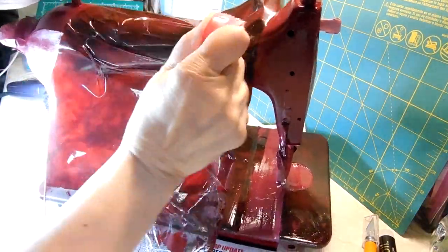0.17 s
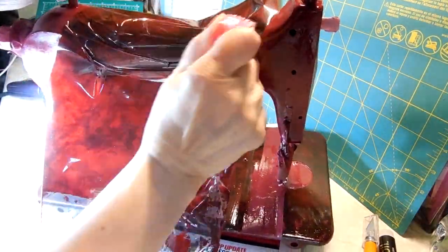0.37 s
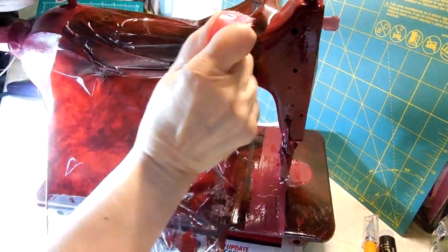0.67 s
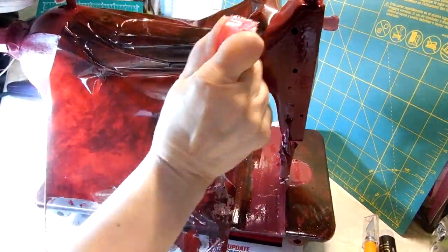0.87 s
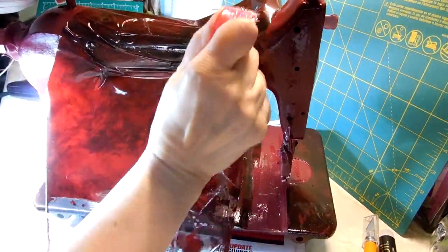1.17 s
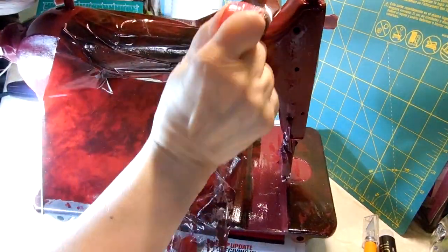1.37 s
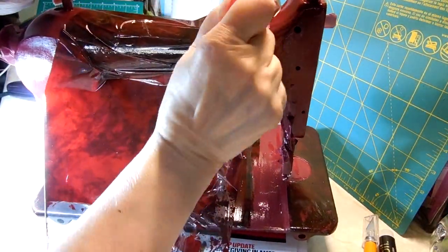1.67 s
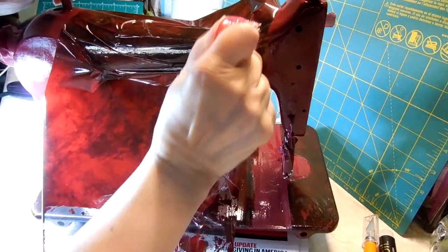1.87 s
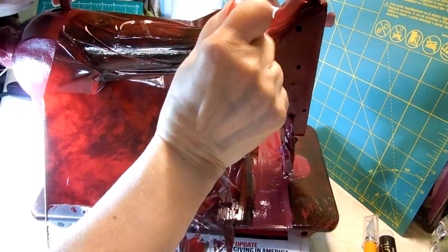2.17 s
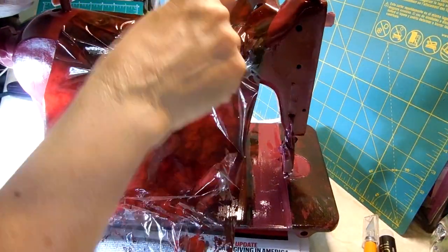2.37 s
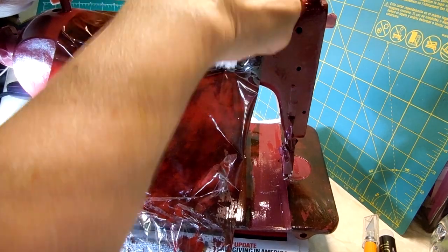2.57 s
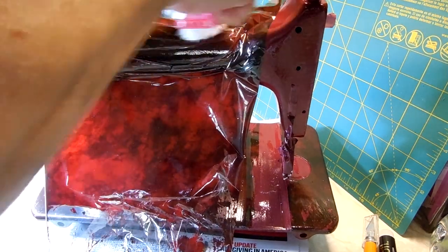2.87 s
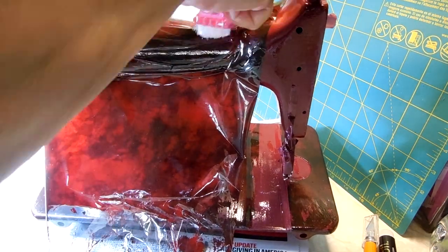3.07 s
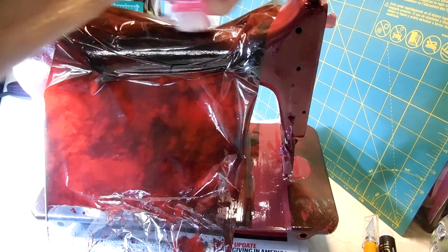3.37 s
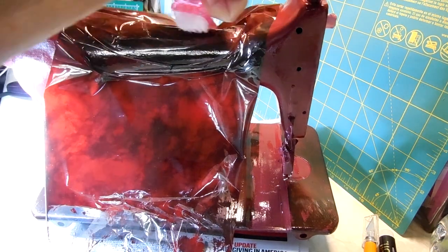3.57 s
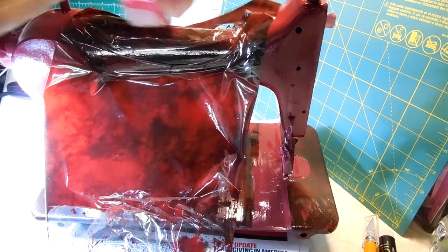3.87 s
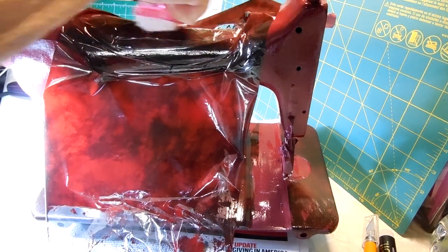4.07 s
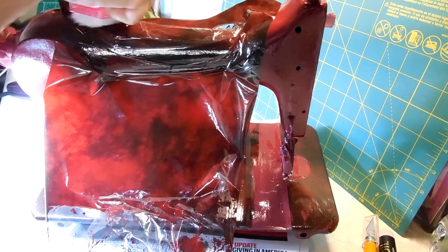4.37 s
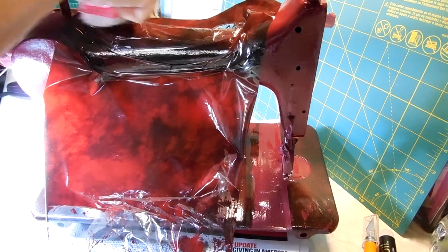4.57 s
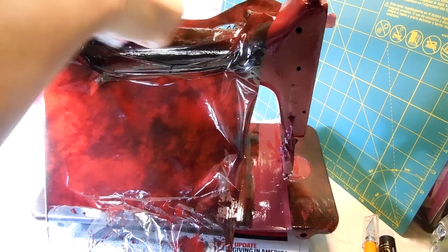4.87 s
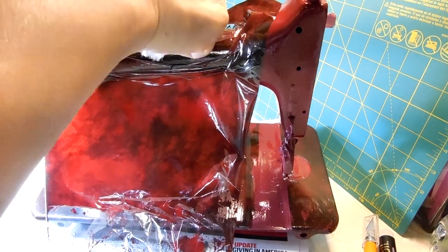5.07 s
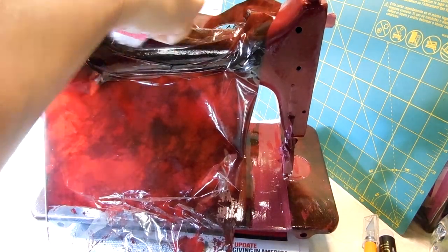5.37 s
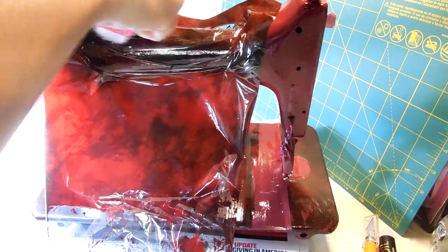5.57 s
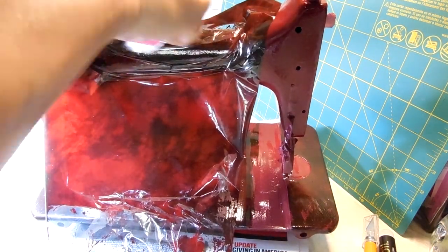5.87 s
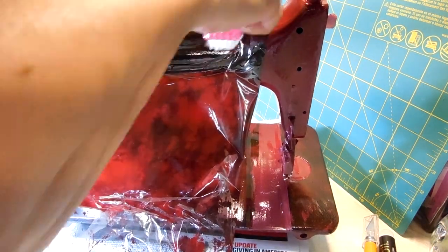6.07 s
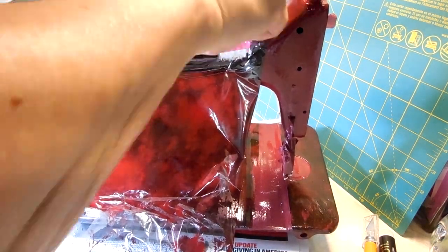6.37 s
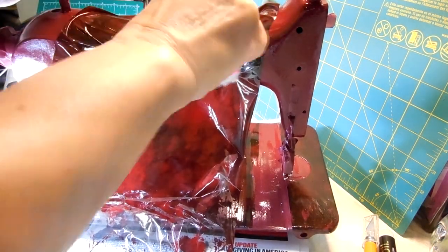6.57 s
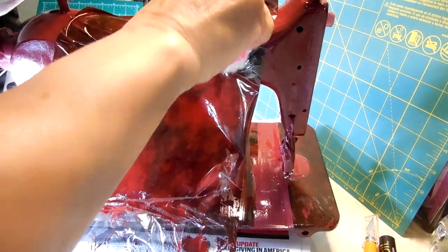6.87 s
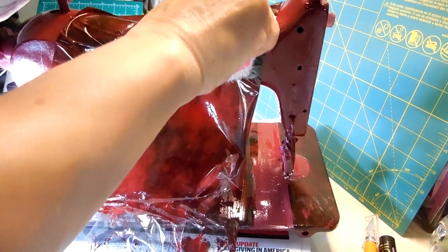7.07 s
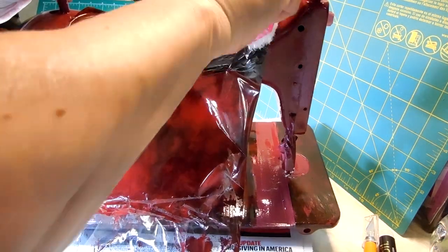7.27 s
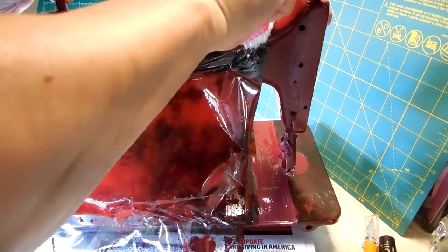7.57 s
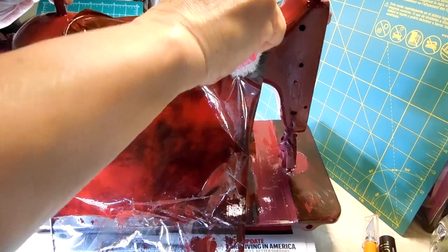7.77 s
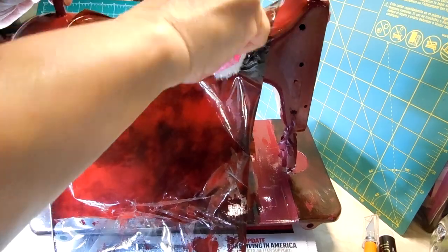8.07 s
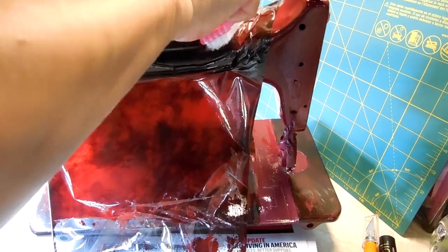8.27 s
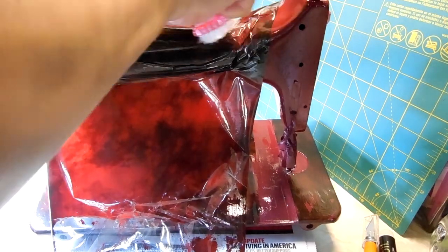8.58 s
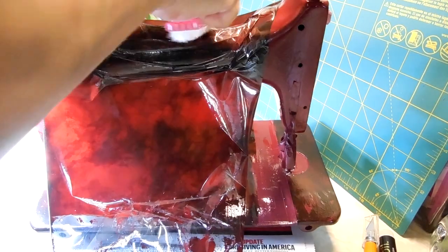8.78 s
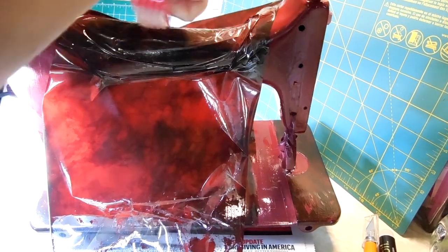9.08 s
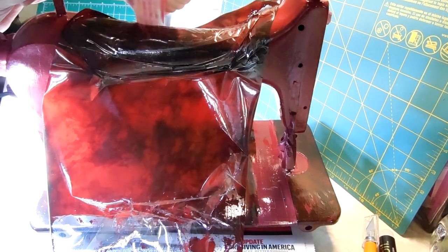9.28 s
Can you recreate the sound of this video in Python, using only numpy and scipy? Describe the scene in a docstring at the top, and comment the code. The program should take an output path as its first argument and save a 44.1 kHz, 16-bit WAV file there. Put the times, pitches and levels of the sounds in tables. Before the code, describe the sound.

Fast, bright, scratchy brush strokes on wrinkled foil with sharp snaps and crackles, nearly stopping once before resuming, in a small room with fan noise.

```python
"""Stiff brush on crumpled foil

A short stiff brush scrubs back and forth over thin foil on a hard body, close to a two-port microphone.
The hiss is dense random bristle flicks and short tuft rings that swell and fade with each stroke.
Folds buckle as short damped sines; big folds snap with a ring, a burst of rattle and a low knock.
A short room answer follows the foil, over filtered fan noise with faint, wavering motor tones.
"""
import sys
import numpy as np
from scipy import signal
from scipy.fft import rfft, irfft, next_fast_len
from scipy.io import wavfile
from scipy.ndimage import uniform_filter1d, map_coordinates

SR = 44100
rng = np.random.default_rng(int(sys.argv[2]) if len(sys.argv) > 2 else 0)


def unload_wav(signal):
    """Save mono or channel-first audio to the path in sys.argv[1] as 16-bit WAV at rate SR, clipped to [-1, 1]."""
    wavfile.write(
        sys.argv[1],
        SR,
        np.round(np.clip(np.atleast_2d(signal).T, -1, 1) * 32767).astype(np.int16),
    )


N = 414981  # length in samples

# Brush strokes, back and forth. Each row: start in seconds, length in seconds,
# drive of the bristle hiss at the fastest moment in dB.
BRUSH_STROKES = [(-0.02, 0.11, -23.5), (0.066, 0.14, -23.5), (0.216, 0.14, -15.0), (0.341, 0.13, -22),
                 (0.487, 0.12, -20.5), (0.592, 0.058, -20), (0.62, 0.11, -20.5), (0.729, 0.22, -20.5),
                 (0.923, 0.094, -29), (0.998, 0.092, -21.5), (1.03, 0.21, -22.5), (1.215, 0.118, -17.0),
                 (1.326, 0.15, -19.0), (1.475, 0.15, -21.0), (1.611, 0.14, -20), (1.753, 0.11, -16.5),
                 (1.865, 0.15, -15.5), (2.007, 0.14, -18), (2.152, 0.12, -17.0), (2.211, 0.23, -25.5),
                 (2.446, 0.14, -15.5), (2.657, 0.12, -19.5), (2.767, 0.033, -24.5), (2.738, 0.2, -27.0),
                 (2.944, 0.087, -17.5), (3.026, 0.075, -28.5), (3.03, 0.231, -26.5), (3.211, 0.065, -19.5),
                 (3.249, 0.17, -21.5), (3.415, 0.11, -17.5), (3.526, 0.13, -14.5), (3.645, 0.13, -19.5),
                 (3.78, 0.13, -19.5), (3.913, 0.11, -20.5), (4.012, 0.12, -19.0), (4.133, 0.101, -21),
                 (4.245, 0.11, -16), (4.358, 0.099, -25.0), (4.482, 0.13, -26.5), (4.574, 0.12, -33),
                 (4.694, 0.12, -27.0), (4.786, 0.12, -28.0), (4.92, 0.1, -27.5), (4.988, 0.17, -36),
                 (5.355, 0.11, -45), (5.486, 0.18, -20.5), (5.695, 0.26, -27.5), (5.91, 0.12, -28),
                 (6.051, 0.083, -20.0), (6.142, 0.19, -21.0), (6.271, 0.059, -25), (6.35, 0.071, -19.5),
                 (6.462, 0.11, -21.5), (6.563, 0.12, -20.0), (6.734, 0.14, -22), (6.901, 0.123, -18.5),
                 (7.023, 0.15, -22.5), (7.171, 0.15, -25.5), (7.321, 0.13, -21), (7.467, 0.17, -28.5),
                 (7.642, 0.16, -26.5), (7.786, 0.16, -31.5), (7.94, 0.2, -30.0), (8.119, 0.14, -22.0),
                 (8.271, 0.12, -21), (8.303, 0.23, -19.0), (8.441, 0.29, -27.5), (8.649, 0.085, -18.5),
                 (8.749, 0.11, -17.5), (8.835, 0.16, -21.5), (8.946, 0.42, -29), (9.266, 0.096, -17.0),
                 (9.344, 0.13, -27)]
FASTEST_AT = 0.51  # share of the stroke spent speeding up
HISS_GROWS, CREASE_GROWS = 2.1, 1.5  # powers of the brush speed


def pressure():
    """Amplitude of hiss and of buckling: every stroke speeds up, then slows to its turn."""
    t = np.arange(N) / SR
    hiss, crease = np.zeros(N), np.zeros(N)
    for start, length, hiss_db in BRUSH_STROKES:
        part = slice(max(round(start * SR), 0), round((start + length) * SR))
        progress = (t[part] - start) / length
        speed = np.sin(np.pi / 2 * np.interp(progress, [0, FASTEST_AT, 1], [0, 1, 0]))
        hiss[part] += amp(hiss_db) * speed ** HISS_GROWS
        crease[part] += amp(hiss_db) * speed ** CREASE_GROWS
    # a smoothed copy of the hiss keeps the foil rustling through the turns
    settling = amp(-9) * uniform_filter1d(hiss, round(0.18 * SR))
    return hiss + np.abs(settling), crease * amp(crumple_db(t))


# Tone of the bristles on the foil. Each row: frequency in Hz, relative level in dB.
BRISTLE_TONE = [(300, -61), (1200, -19.5), (2400, -12.5), (3300, -9.5), (5900, -6.5), (7800, -1),
                (10100, -6), (12100, -15), (14000, -22.5), (16400, -42)]


def bristles(hiss):
    """Dense single flicks of uneven size, and tufts that ring the foil briefly at a pitch of their own."""
    count = 250000
    size = rng.standard_normal(count) * uneven(2.4, count)
    flicks = unit(scattered(rng.uniform(0, N / SR, count), size[:, None], lag_s=3.3e-5))

    count = 16000
    pitch_hz = rng.uniform(2030, 13150, count)
    rings = uneven(2.6, count)[:, None] * buckles(pitch_hz, cycles=30, size=200)
    tufts = unit(scattered(rng.uniform(0, N / SR, count), rings, lag_s=4e-5))

    grip = catches(rate=80, spread_db=2.0, fade_s=0.0065, steady=1.32)
    return hiss * unit(coloured((flicks + amp(-5.0) * tufts) * grip, BRISTLE_TONE))


def catches(rate, spread_db, fade_s, steady):
    """Over a steady drag, bristle tufts catch at random, let go at once and then die away."""
    count = round(rate * N / SR)
    kicks = np.bincount(rng.integers(0, N, count), uneven(spread_db, count), N)
    fading = signal.lfilter([1], [1, -np.exp(-1 / (fade_s * SR))], kicks)
    return unit(steady + fading)


# Tone of the small folds. Each row: frequency in Hz, relative level in dB.
CREASE_TONE = [(150, -29), (300, -15), (480, -8), (720, -7.5), (1000, -3), (1520, -5.5), (2350, 1.5),
               (3600, -2), (9000, -20.5)]


def creases(crease):
    """Small folds of foil buckle, each with a short ring of its own pitch."""
    count = 12000
    pitch_hz = (1800 * np.exp(0.5 * rng.standard_normal(count))).clip(300, 9000)
    size = rng.choice([-1, 1], count) * uneven(3.3, count)  # folds pop either way
    rings = size[:, None] * buckles(pitch_hz, cycles=22.6, size=400)
    folds = scattered(rng.uniform(0, N / SR, count), rings, lag_s=2.4e-5)
    grip = catches(rate=38, spread_db=2.5, fade_s=0.0051, steady=2.4)
    return crease * unit(coloured(folds * grip, CREASE_TONE))


# How crumpled the foil under the brush is. Each row: time in seconds,
# drive of the crease buckling against the hiss in dB, ahead of the crease fader in the mix.
FOIL_CRUMPLE = [(0, -6.5), (0.6, -9.5), (0.9, -7), (1.5, -9), (2.7, -13), (3.1, -5.5), (3.9, -4.5),
                (4.4, -11.5), (4.7, -39), (5.1, -18), (5.5, -10.5), (6.2, -7), (6.6, -12), (7.3, -22),
                (8.0, -41), (8.3, -11.5), (8.7, -11.5), (9.15, 1.5), (9.3, -3.5)]


def crumple_db(seconds):
    """How crumpled the foil is where the brush works."""
    return np.interp(seconds, *np.transpose(FOIL_CRUMPLE))


# Loud snaps of the foil. Each row: time in seconds, drive of the snap in dB,
# pitch of the buckle in Hz.
FOIL_SNAPS = [(0.029, -4, 8200), (0.092, -6.5, 7450), (0.117, -1.5, 7400), (0.243, -9, 8010),
              (0.272, -10, 8050), (0.277, -15.5, 605), (0.292, -14.5, 510), (0.367, -5, 9400),
              (0.436, -11, 7580), (0.515, -11, 8870), (0.539, 1.5, 7580), (0.546, -16.5, 980),
              (0.652, -2.5, 9470), (0.68, -9.5, 1730), (0.782, -6.5, 1750), (0.794, -9, 880),
              (0.862, -12, 2210), (0.972, -6, 6700), (1.096, -4.5, 3370), (1.141, -6.5, 2330),
              (1.247, -10, 9600), (1.371, -10.5, 2370), (1.422, -5.5, 2310), (1.667, -6, 7280),
              (1.775, -0.5, 4070), (1.904, -3, 7970), (2.277, -7.5, 3750), (2.345, -4, 7300),
              (2.381, -8, 7620), (2.477, -9, 7200), (2.704, -8, 3100), (2.828, -10, 5570), (2.838, 1, 5430),
              (2.965, -12, 7660), (3.046, -7, 2520), (3.137, -5, 4400), (3.172, -13, 7280),
              (3.237, -7.5, 1210), (3.241, 0.5, 8400), (3.296, -12, 2900), (3.363, -3, 2480),
              (3.43, -6.5, 8180), (3.465, -6.5, 2280), (3.478, -13, 1040), (3.541, -6, 3170),
              (3.558, -4.5, 2320), (4.048, -11, 2230), (4.154, -5, 7640), (4.254, -16.5, 1060),
              (4.317, -7, 2220), (4.556, -12, 7840), (4.601, -12.5, 7900), (4.724, -11, 10210),
              (5.21, -27, 8000), (5.271, -31, 7860), (5.443, -18.5, 2530), (5.513, -11, 2220),
              (5.542, -2, 2500), (5.556, -8, 2460), (5.602, -11, 2130), (5.666, -15, 7500),
              (5.742, -14, 2380), (5.761, -19, 1300), (5.806, -1.5, 7100), (5.863, -14.5, 2400),
              (5.953, -14.5, 1900), (6.08, -4.5, 2600), (6.095, -14, 2580), (6.18, -22, 1020),
              (6.22, -22.5, 446), (6.239, -4, 3180), (6.255, -15, 1000), (6.263, -8, 3130),
              (6.332, -5, 7450), (6.581, -4, 4780), (6.817, -6.5, 2780), (6.918, -14, 4310),
              (7.071, -7, 5550), (7.354, -9, 7850), (7.812, -18, 7800), (8.317, -9.5, 2230),
              (8.339, -6, 2760), (8.688, -1.5, 4000), (8.764, -3.5, 7700), (8.795, -9, 1240),
              (8.887, 1.5, 7400), (8.904, -4, 2080), (8.943, -9.5, 2410), (9.11, -14, 2330),
              (9.196, -4, 2280), (9.276, -6, 7320), (9.309, -5.5, 970), (9.335, -16.5, 523)]
# drive of the knock against a 2 kHz snap, and its tilt with pitch
KNOCK_DB, KNOCK_DB_PER_OCTAVE = -9, -4
KNOCK_FOLLOWS_CRUMPLE = 0.55  # dB per dB; wide, low folds in crumpled foil knock most


def snaps():
    """A big fold gives way: a buckle, a burst of rattling foil and a low knock on the body below."""
    seconds, db, hz = np.transpose(FOIL_SNAPS)
    t = np.arange(1800) / SR
    noise = rng.standard_normal((len(hz), 3, len(t)))

    ring = amp(db - 1)[:, None] * buckles(hz, cycles=18.6, size=len(t))

    brightness = np.clip(hz / 4500, 0, 1) ** 0.19  # wide, low folds shake the fine wrinkles less
    rattle = brightness[:, None] * amp(db[:, None] - 60 * t / 0.02)
    burst = sum(scattered(seconds, rattle * noise[:, spot], lag_s=4e-5) for spot in (0, 1))

    knock_db = KNOCK_DB + KNOCK_DB_PER_OCTAVE * np.log2(hz / 2000)
    knock_db = knock_db + KNOCK_FOLLOWS_CRUMPLE * crumple_db(seconds)
    thud = amp((db + knock_db)[:, None] - 60 * t / 0.045) * noise[:, 2]
    knock = scattered(seconds, thud, lag_s=2.4e-5)

    buckle = scattered(seconds, ring, lag_s=3e-5)
    return buckle + amp(-2.0) * coloured(burst, BRISTLE_TONE) + amp(9.5) * coloured(knock, CREASE_TONE)


# Decay of the small room. Each row: frequency in Hz, time to fall 60 dB in seconds.
ROOM_DECAY = [(300, 0.13), (2000, 0.15), (10000, 0.17)]


def room(x):
    """A noise tail answers the foil; each frequency of it dies at its own speed."""
    hz, t, z = signal.stft(rng.standard_normal((2, SR // 2)), SR, nperseg=256)
    decay = amp(-60 * t / along(ROOM_DECAY, hz)[:, None])
    tail = signal.istft(z * decay, SR, nperseg=256)[1]
    wet = signal.fftconvolve(x.mean(0)[None], tail / np.linalg.norm(tail[0]), axes=1)[:, :N]
    return diffuse(wet, [(1000, 0)])  # flat spectrum


# Tone of the fan's air noise. Each row: frequency in Hz, relative level in dB.
FAN_TONE = [(20, -28), (40, -13), (85, -18), (120, -7), (239, -10), (384, -2), (540, -3.5), (850, -2),
            (1760, -4.5), (2700, -10.5), (3400, -13), (9000, -18.5), (13000, -25.5), (16000, -60)]
# Motor tones. Each row: frequency in Hz, drive in dB ahead of the hum's lift and wavering.
MOTOR_HUM = [(58.8, -65.5), (114.6, -59.5), (146.9, -66), (293.6, -60), (341.9, -57), (387, -57),
             (457, -59), (484.5, -58.5), (798.9, -53.5), (1024, -59), (1333, -52.5)]


def fan():
    """Nearly steady air noise, with motor tones that waver in level and phase."""
    air = unit(diffuse(rng.standard_normal((2, N)), FAN_TONE))
    air = amp(-40.0 + 0.69 * wobble(3.195)) * air
    t = np.arange(N) / SR
    hum = np.zeros(N)
    for hz, db in MOTOR_HUM:
        level = amp(db + 1.5 + 3.3 * wobble(25))
        drift = (hz / 90) ** 0.26 * wobble(11)  # radians; higher tones drift more
        hum += level * np.sin(2 * np.pi * hz * t + drift)
    return air + hum


# Stereo width of diffuse sound. Each row: frequency in Hz, left-right likeness from 0 to 1.
DIFFUSE_LIKENESS = [(60, .99), (400, 1), (1000, 0.94), (2500, 0.69), (5000, 0.04)]


def diffuse(pair, spectrum):
    """Two unrelated signals mixed so that left and right are alike in the bass only."""
    def mid_and_side(hz):
        turn = np.arccos(np.clip(along(DIFFUSE_LIKENESS, hz), -1, 1)) / 2
        return amp(along(spectrum, hz)) * [np.cos(turn), np.sin(turn)]

    mid, side = filtered(pair, mid_and_side)
    return np.array([mid + side, mid - side])


def scattered(seconds, shapes, lag_s):
    """Sum of short shapes; each comes from its own spot, so it reaches one port a little before the other."""
    lag = lag_s * rng.laplace(size=len(seconds)) / 2
    start = np.round((seconds + np.array([lag, -lag])) * SR).astype(int).clip(0)
    index = start[:, :, None] + np.arange(shapes.shape[1])
    return np.array([np.bincount(i.ravel(), shapes.ravel(), N + SR)[:N] for i in index])


def buckles(hz, cycles, size):
    """Damped sines that lose 60 dB in so many cycles, one row each."""
    turns = hz[:, None] * np.arange(size) / SR
    return amp(-60 * turns / cycles) * np.sin(2 * np.pi * turns)


def uneven(spread_db, count):
    """Mostly small sizes, a few large ones, with a ceiling."""
    return amp(spread_db * rng.exponential(size=count).clip(0, 4.5))


def wobble(rate):
    """A smooth random curve, rate knots a second."""
    coarse = np.arange(0, N + 64, 64)
    knots = rng.standard_normal(int(N * rate / SR) + 4)
    curve = map_coordinates(knots, [coarse * rate / SR])
    return np.interp(np.arange(N), coarse, curve)


def coloured(x, points):
    """x through the causal filter with that (Hz, dB) spectrum."""
    cepstrum = irfft(np.log(amp(along(points, np.fft.rfftfreq(2048, 1 / SR)))))
    # folding the cepstrum forward gives minimum phase, so attacks stay sharp
    cepstrum[1:1024] *= 2
    cepstrum[1025:] = 0
    impulse = irfft(np.exp(rfft(cepstrum)))
    return signal.fftconvolve(x, impulse[None], axes=1)[:, :N]


def filtered(x, response):
    """x times a response of frequency."""
    m = next_fast_len(N + SR // 2)
    return irfft(rfft(x, m) * response(np.fft.rfftfreq(m, 1 / SR)), m)[..., :N]


def along(points, hz):
    """(Hz, value) points read on a log frequency axis."""
    f, v = np.transpose(points)
    return np.interp(np.log(hz + 1), np.log(f + 1), v)


def unit(x):
    """Scaled to rms 1."""
    return x / np.sqrt(np.mean(x ** 2) + 1e-20)


def amp(db):
    """Gain of a level in dB."""
    return 10 ** (np.asarray(db) / 20)


def scene():
    """Brush and foil in the room, over the fan."""
    hiss, crease = pressure()
    foil = bristles(hiss) + amp(-3.5) * creases(crease) + snaps()
    foil = filtered(foil, lambda hz: 1 / (1 + (260 / (hz + 1)) ** 4))  # the foil sounds carry no deep bass
    return foil + amp(-8) * room(foil) + fan()


# Balance of the two ports. Each row: frequency in Hz, left over right in dB.
PORT_BALANCE = [(300, 0), (2700, 0.5), (4200, 0.5), (6400, -1.5), (7700, -7.5), (9800, 7.5), (13000, 10)]
# Treble roll-off of the microphone. Each row: frequency in Hz, gain in dB.
MICROPHONE_TREBLE = [(14000, 0), (15300, -15), (16000, -40)]
TOP_HZ = 16500  # nothing passes from here up
# gain control: above the reference it turns down, below it lifts, dB per dB, averaged over so long
AGC_REFERENCE_DB, AGC_SLOPE, AGC_S = -22.5, 0.16, 0.495


def record(dry):
    """Ports differ in treble, gain control evens the level, loud peaks round off, the top falls away."""
    ports = filtered(dry, lambda hz: amp(along(PORT_BALANCE, hz) * [[0.5], [-0.5]]))
    size = round(AGC_S * SR)
    # the shifted window averages only what has already sounded
    power = uniform_filter1d((ports ** 2).mean(0), size, origin=(size - 1) // 2)
    level_db = 10 * np.log10(np.abs(power) + 1e-9)
    ports = ports * amp(AGC_SLOPE * (AGC_REFERENCE_DB - level_db))
    soft = ports / (1 + np.abs(ports / 0.9) ** 4) ** (1 / 4)
    return filtered(soft, lambda hz: amp(along(MICROPHONE_TREBLE, hz)) * (hz < TOP_HZ))


dry = scene()
out = record(dry)
unload_wav(out)
```